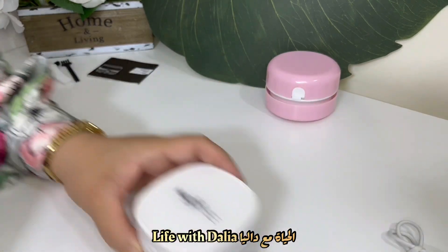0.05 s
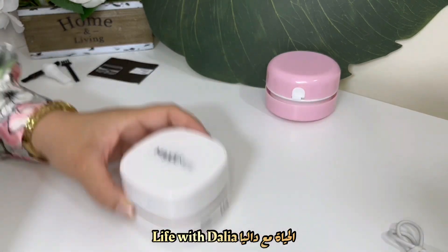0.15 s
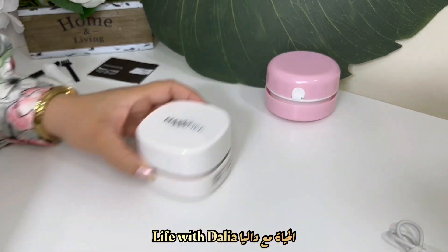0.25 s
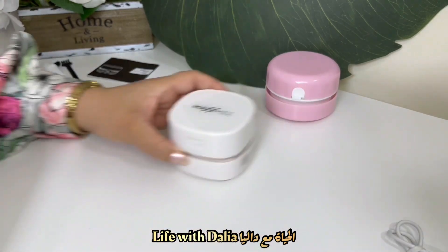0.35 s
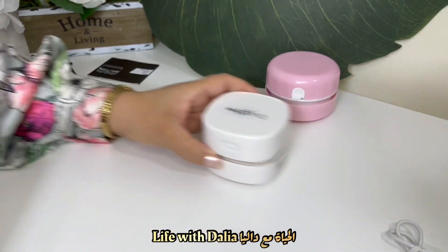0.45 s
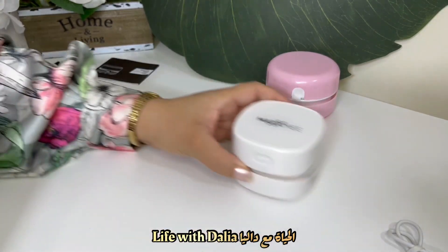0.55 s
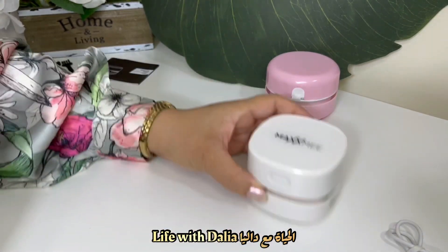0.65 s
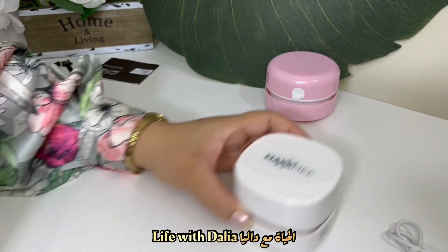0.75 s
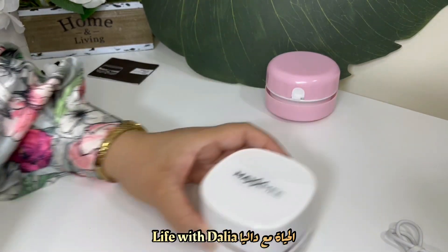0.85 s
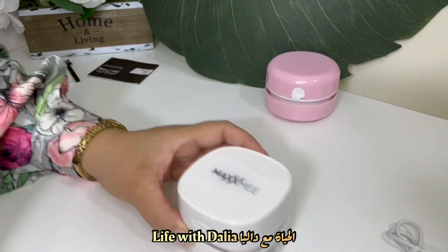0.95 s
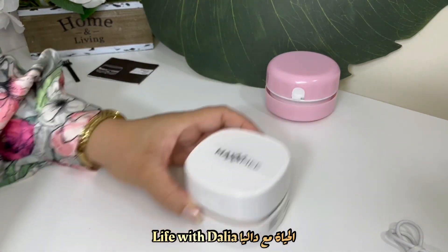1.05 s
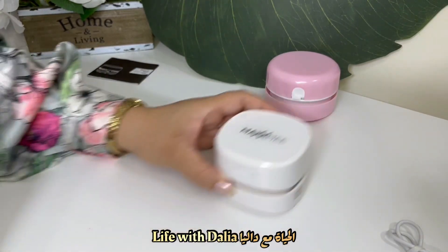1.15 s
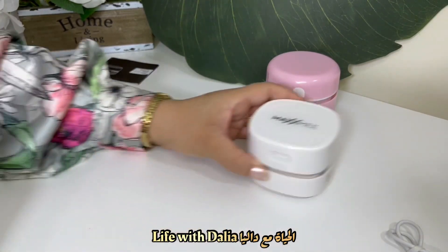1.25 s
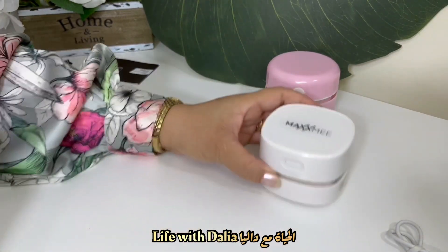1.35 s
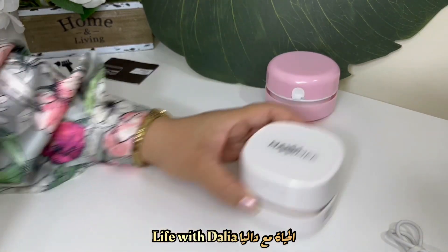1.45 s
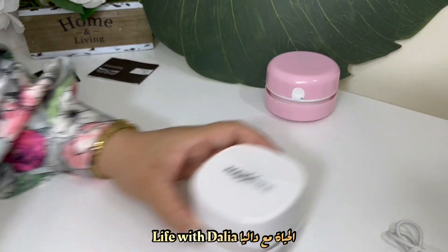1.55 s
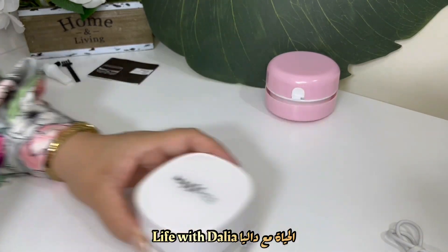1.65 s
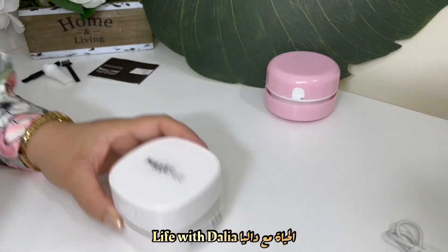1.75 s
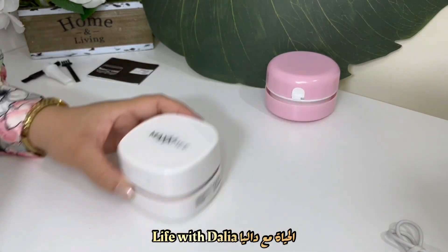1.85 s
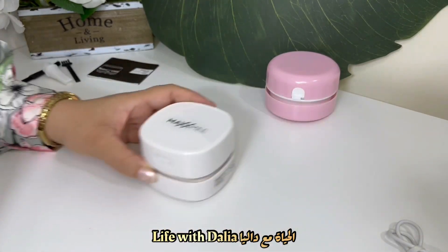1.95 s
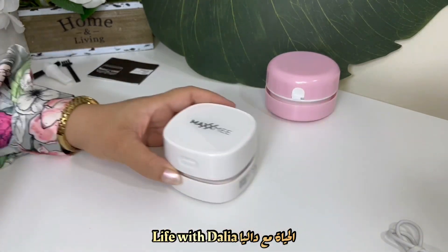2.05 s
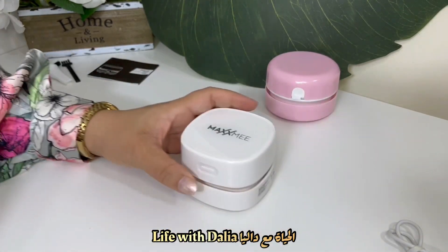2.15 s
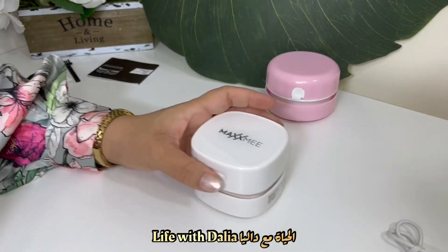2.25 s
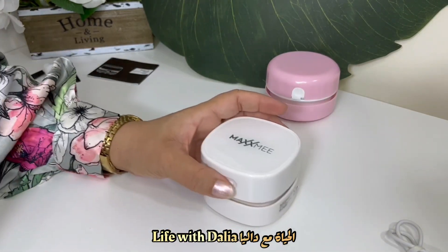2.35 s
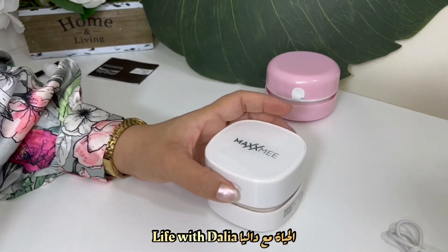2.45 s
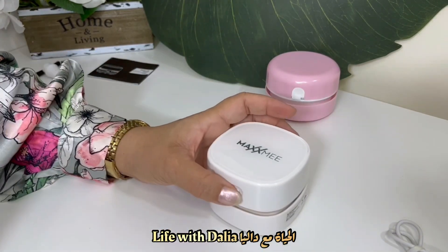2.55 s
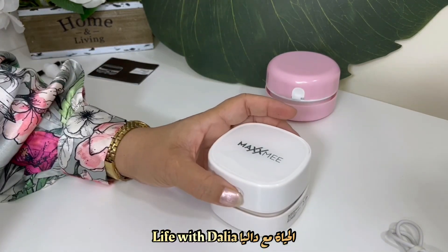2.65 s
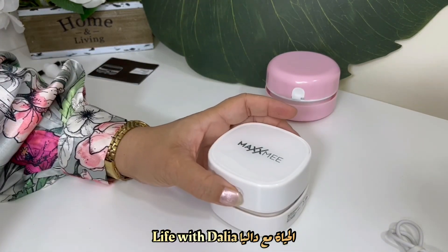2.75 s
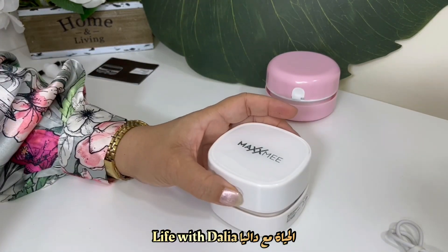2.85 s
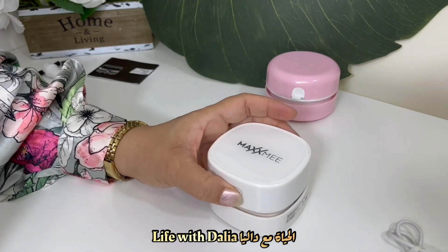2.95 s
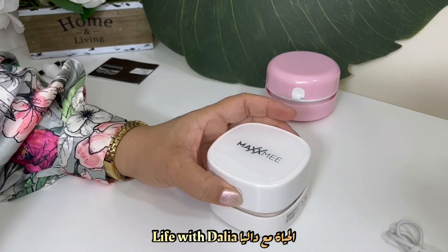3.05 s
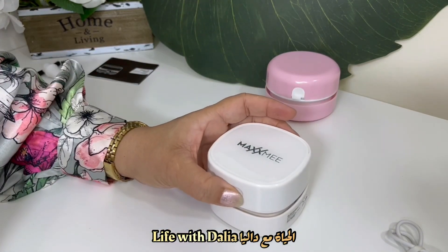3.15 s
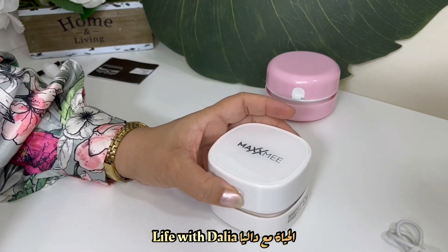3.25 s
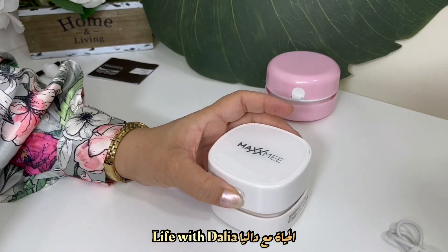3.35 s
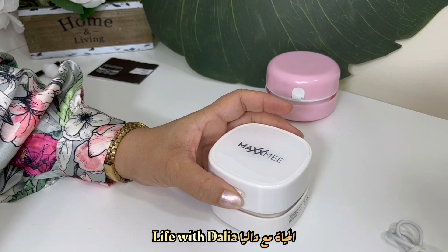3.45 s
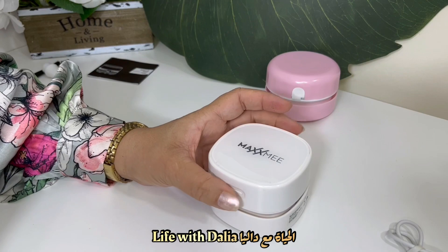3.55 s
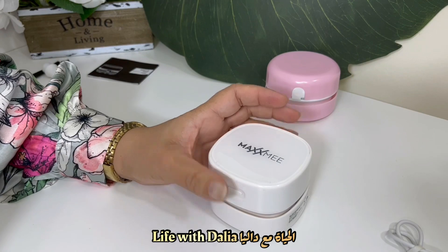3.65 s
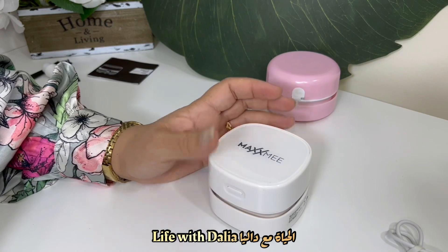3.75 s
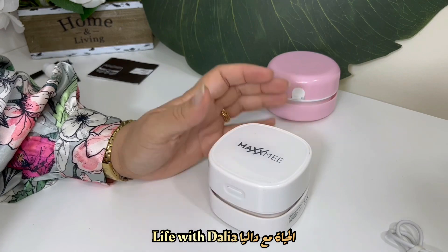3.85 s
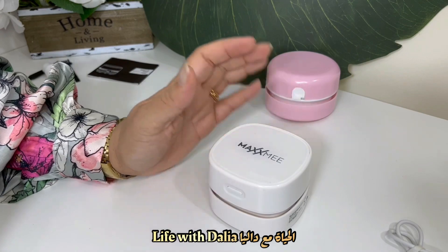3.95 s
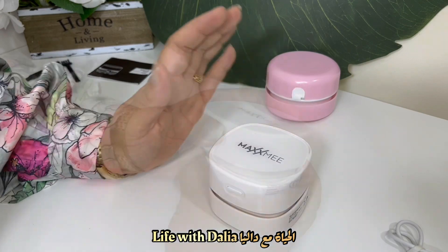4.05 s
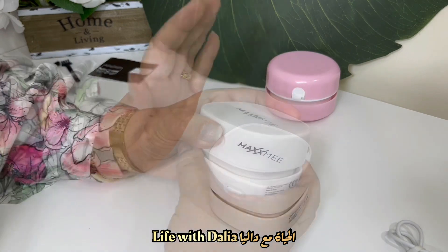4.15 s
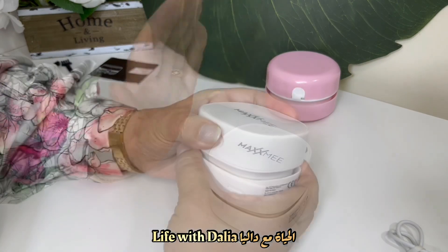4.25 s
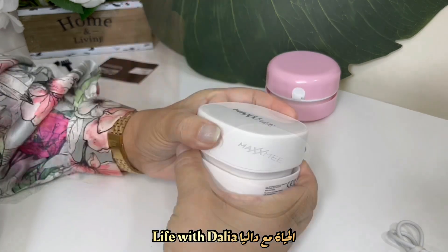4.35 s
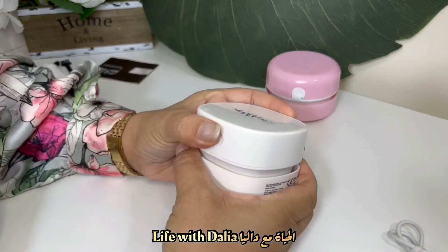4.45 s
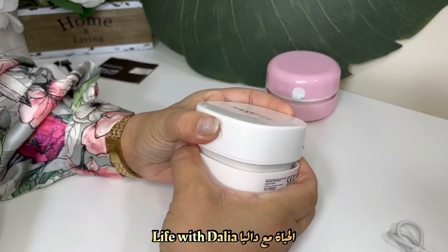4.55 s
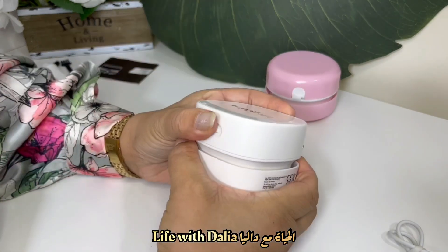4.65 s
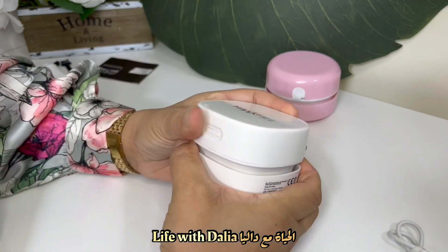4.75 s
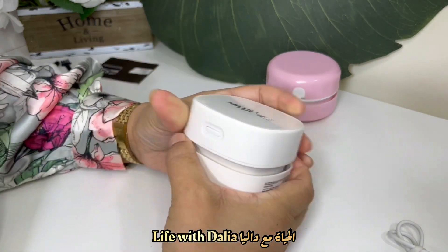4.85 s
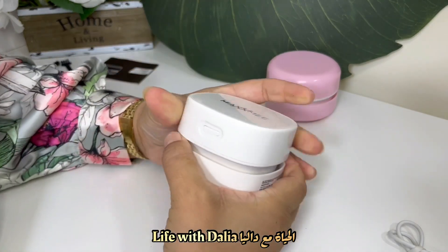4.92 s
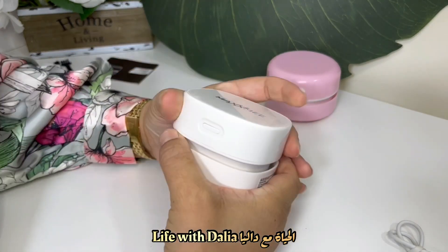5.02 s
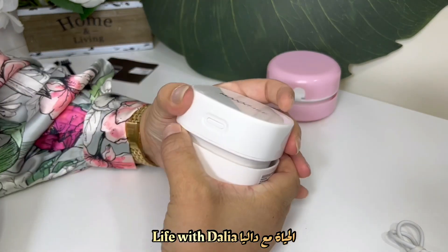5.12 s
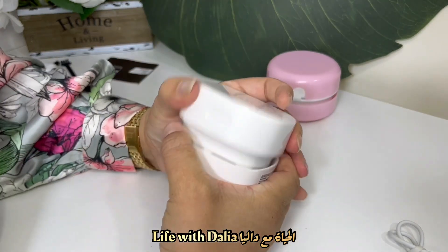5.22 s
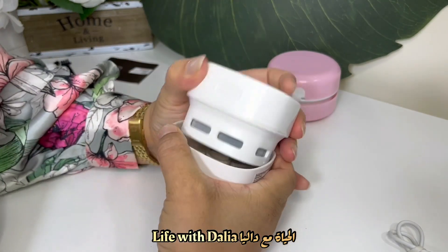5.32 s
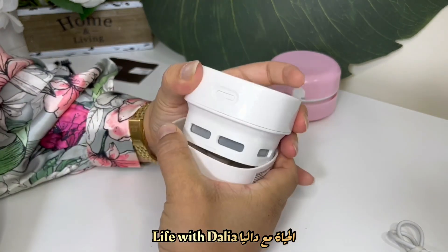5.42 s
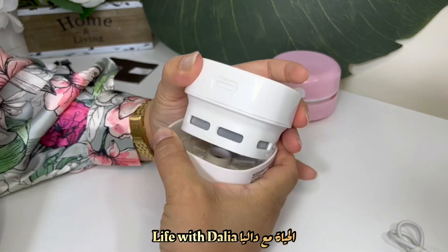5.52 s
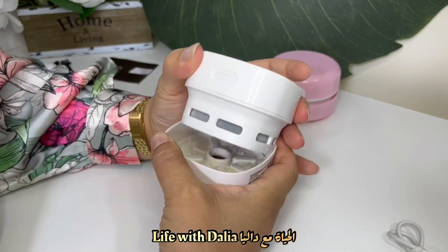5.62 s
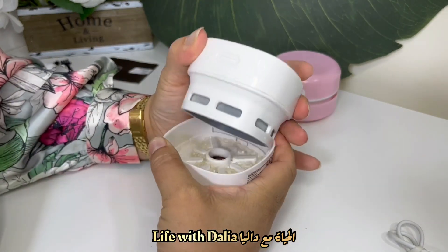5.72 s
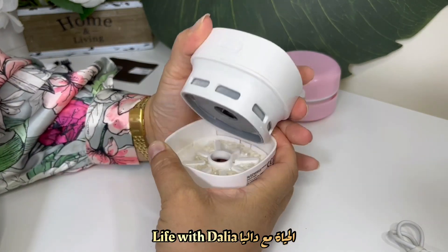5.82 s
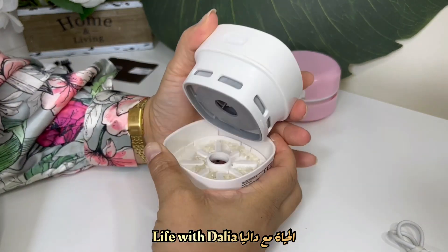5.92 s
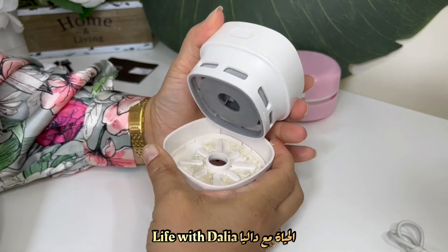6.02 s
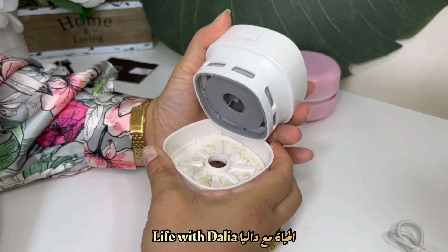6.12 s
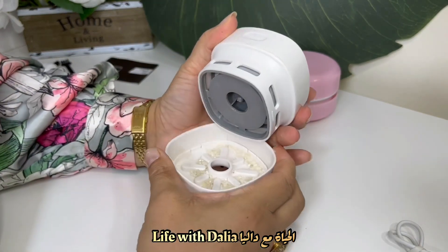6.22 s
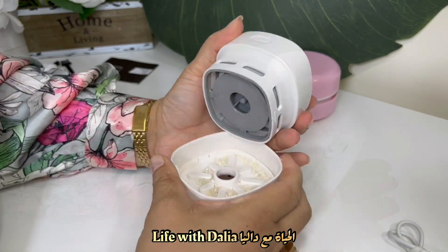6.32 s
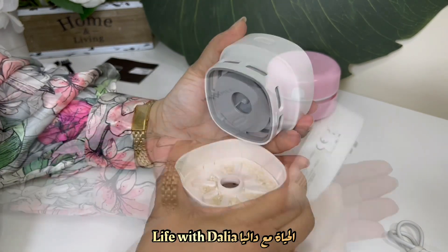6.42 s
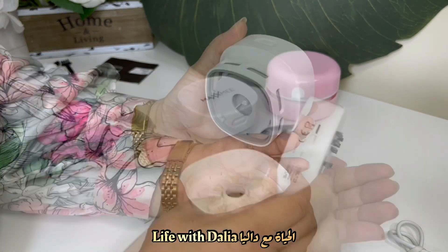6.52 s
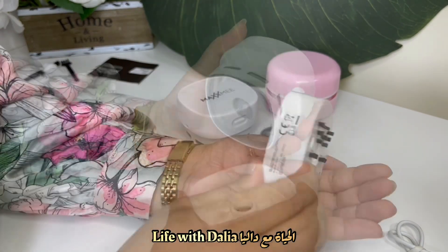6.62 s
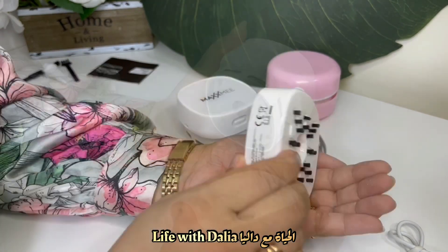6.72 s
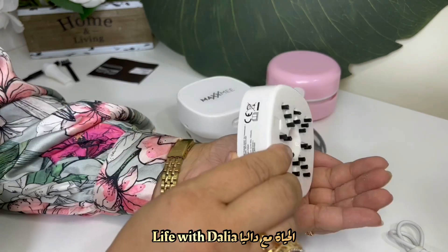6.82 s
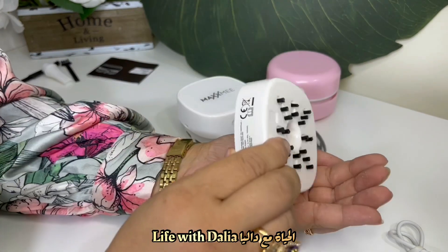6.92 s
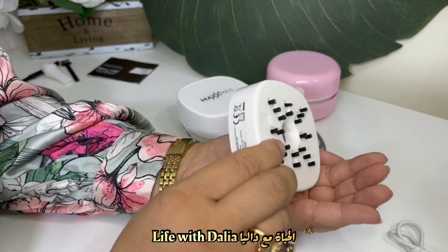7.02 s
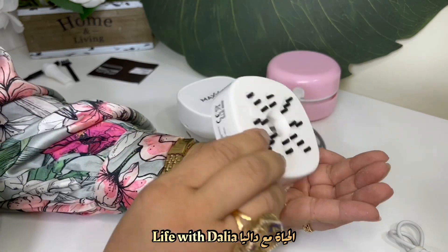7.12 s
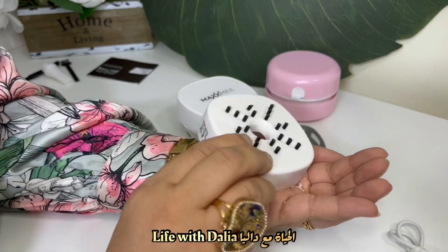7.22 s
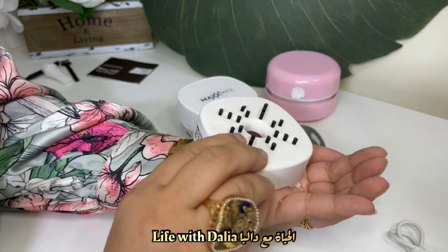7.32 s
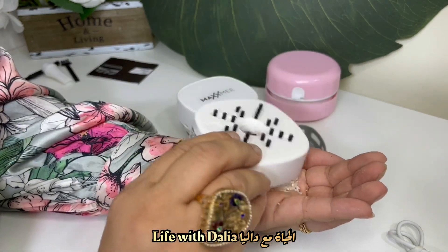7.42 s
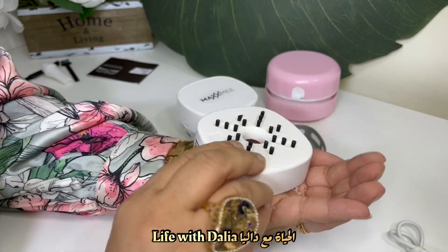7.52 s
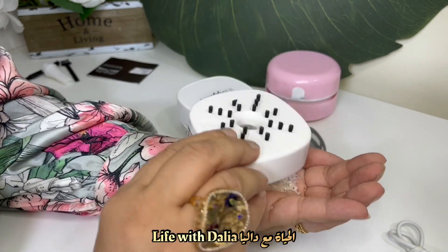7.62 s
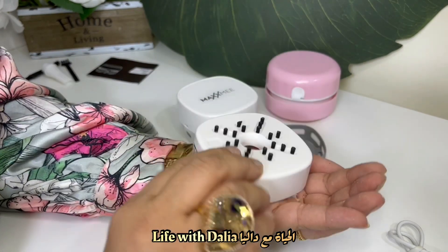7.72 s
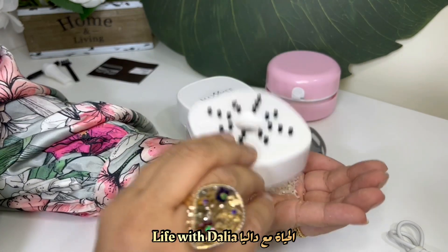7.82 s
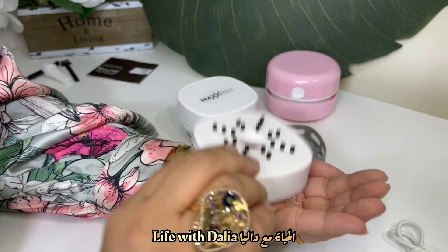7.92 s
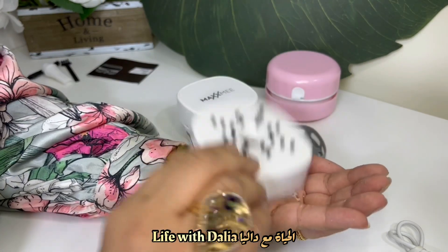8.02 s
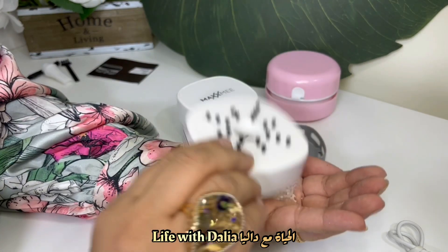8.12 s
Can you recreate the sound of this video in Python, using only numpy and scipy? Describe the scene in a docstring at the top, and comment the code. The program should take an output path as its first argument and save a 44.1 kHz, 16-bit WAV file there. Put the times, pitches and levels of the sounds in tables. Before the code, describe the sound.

A small battery vacuum hisses with rice grains hailing inside its plastic cup, coasts down, is snapped open, then rice is poured and tapped out.

```python
"""A palm-sized battery vacuum is slid over a table; rice grains whirl inside and hail on its plastic cup.
It is switched off: the fan coasts down, its motor hums and knocks, and the last grains drop.
The cup is twisted off with scrapes and snaps, then the rice is poured and tapped out into a hand.
Random grain hits, rubbing noise and air noise ring filters shaped like each object; sine waves make the hums.
A small room answers, over a faint rumble and hum."""
import sys
import numpy as np
from scipy import signal
from scipy.fft import rfft, irfft, next_fast_len
from scipy.io import wavfile

SR = 44100
rng = np.random.default_rng(int(sys.argv[2]) if len(sys.argv) > 2 else 0)


def transcribe(signal):
    """Save signal, clipped to [-1, 1], as a 16-bit WAV file at the path in sys.argv[1]."""
    frames = np.atleast_2d(signal).T
    limited = np.clip(frames, -1, 1)
    pcm = np.round(limited * 32767).astype(np.int16)
    wavfile.write(sys.argv[1], SR, pcm)


N = 360297
T = np.arange(N) / SR
SIZE = 2 ** 13  # filter length in samples
HZ = np.maximum(np.arange(SIZE // 2 + 1) * SR / SIZE, 1)
CUTOFF_HZ = 15850


def from_db(db):
    """Turn decibels into gain."""
    return 10 ** (np.asarray(db) / 20)


def rms_one(x):
    """Scale to an rms of 1."""
    return x / np.sqrt(np.mean(x ** 2) + 1e-20)


def over_hz(points, at=HZ):
    """Join points by straight lines on a log-frequency axis."""
    hz, value = np.transpose(points)
    return np.interp(np.log(at), np.log(hz), value)


def resonances(modes):
    """Gain of several resonances, their powers added."""
    power = 0
    for hz, width_hz, db in modes:
        detuning = (HZ ** 2 - hz ** 2) / (HZ * width_hz)
        power = power + from_db(db) ** 2 / (1 + detuning ** 2)
    return np.sqrt(power)


def drift(rate_hz):
    """Slow random wavering with an rms of 1, drawn at every 20th sample."""
    r = np.exp(-40 * np.pi * rate_hz / SR)
    noise = rng.standard_normal(N // 20 + 2002)
    slow = signal.lfilter([1], [1, -2 * r, r * r], noise)[2000:]
    return np.interp(np.arange(N) / 20, np.arange(len(slow)), rms_one(slow))


def radiate(force, gain):
    """Two rows of force ring a body: a filter of unit power that never sounds before the force."""
    gain = gain / np.sqrt(np.mean(gain[HZ < CUTOFF_HZ] ** 2))
    # Folding the cepstrum puts the filter's energy as early as possible (minimum phase).
    cepstrum = irfft(np.log(gain + 1e-6))
    cepstrum[1:SIZE // 2] *= 2
    cepstrum[SIZE // 2 + 1:] = 0
    response = irfft(np.exp(rfft(cepstrum)))
    rung = signal.oaconvolve(force, response[None], axes=1)
    return rung[:, :force.shape[1]]


def hail(per_s, spread_db):
    """Random impacts of uneven size, scaled so that the rate does not change the level."""
    sizes = from_db(spread_db * np.minimum(rng.exponential(1, N), 4))
    chance = np.clip(per_s / SR, 1e-5, 1)
    hits = (rng.random(N) < chance) / np.sqrt(chance)
    return rms_one(sizes) * hits * rng.standard_normal((2, N))


def contacts(times, levels_db, chatter_s):
    """Each contact is a burst of tiny random impacts that dies within milliseconds."""
    force, age = np.zeros((2, N + SR)), T[:SR // 20]
    for s, db in zip(times, levels_db):
        start = round(s * SR)
        burst = rng.standard_normal((2, len(age))) * np.exp(-age / chatter_s)
        force[:, start:start + len(age)] += from_db(db) * burst
    return force[:, :N]


def struck(s, db, chatter_s, gain):
    """One contact rings a body with a colour of its own."""
    out, age, start = np.zeros((2, N + SR)), T[:SR // 6], round(s * SR)
    burst = from_db(db) * rng.standard_normal((2, len(age))) * np.exp(-age / chatter_s)
    out[:, start:start + len(age)] = radiate(burst, gain)
    return out[:, :N]


def ramp(start, length):
    """Rise from 0 to 1 in a straight line."""
    return np.clip((T - start) / max(length, 1e-4), 0, 1)


def since(start):
    """Seconds gone by since a moment, zero before it."""
    return np.maximum(T - start, 0)


def strokes(rows, release_s, column=0):
    """Gain of a run of gestures: each rises, holds and dies away; column picks one of their levels."""
    power = 0
    for start, rise, hold, *levels_db in rows:
        release = np.exp(-np.minimum(since(start + rise + hold) / release_s, 20))
        power = power + (from_db(levels_db[column]) * ramp(start, rise) * release) ** 2
    return np.sqrt(power)


ROOM_T60_S = 0.26  # the duller part of the tail falls 60 dB in this time


def room(x, wet_db, early_db):
    """Early echoes of nearby things shift slowly at random; in the diffuse tail the treble dies sooner."""
    age = T[:SR // 2]
    noise = rng.standard_normal((2, len(age)))
    dull = signal.sosfilt(signal.butter(1, 4500, fs=SR, output="sos"), noise)
    bright_fade = from_db(-60 * age / (0.35 * ROOM_T60_S))
    tail = dull * from_db(-60 * age / ROOM_T60_S) + (noise - dull) * bright_fade
    tail = rms_one(tail * (age > .004)) / np.sqrt(len(age))
    out = x + from_db(wet_db) * signal.oaconvolve(x, tail, axes=1)[:, :N]
    # Two patterns of early echoes trade places slowly.
    age, place = T[:SR // 40], 1.5 * drift(1.5)
    for share in (np.cos(place), np.sin(place)):
        early = rng.standard_normal((2, len(age))) * np.exp(-age / 0.004) * (age > .001)
        early = rms_one(early) / np.sqrt(len(age))
        out = out + from_db(early_db) * share * signal.oaconvolve(x, early, axes=1)[:, :N]
    return out


# Colour of the room rumble: pitch_hz, relative level_db
RUMBLE_COLOUR = [(20, -29.5), (40, -15), (60, -4), (120, -7), (190, -19.5), (300, -18.5), (480, -26),
                 (800, -33), (1200, -42.5), (2200, -38.5), (3000, -45), (8000, -49), (15600, -61.5)]
# Tones of the room hum: pitch_hz, relative level_db
ROOM_HUM = [(99, -2), (148, -7.5)]
# Pushing and handling the vacuum: start_s, rise_s, hold_s, relative level_db
HANDLING_RUMBLE = [(0, 0.0052, 0.045, -49.5), (.15, 0.048, 2.26, -71), (6.48, 0.26, 0.17, -64),
                   (7.35, 0.15, 0.82, -66)]
# Colour of that rumble: pitch_hz, relative level_db
HANDLING_COLOUR = [(25, -14.5), (70, -1), (130, -5), (220, -12), (400, -14), (700, -28.5), (2000, -56)]
# The background is faint at first and swells as the vacuum runs down.
RUMBLE_START_DB, HUM_START_DB = -74, -72.5
SWELL_DB, SWELL_START_S, SWELL_TAKES_S = 11.5, 3.6, 0.49


def background():
    """Shaped noise makes the low room rumble and the rumble of the hands; wavering sines make the hum."""
    rumble = radiate(rng.standard_normal((2, N)), from_db(over_hz(RUMBLE_COLOUR)))
    hum = 0
    for hz, db in ROOM_HUM:
        tone = np.sin(2 * np.pi * hz * T + 0.25 * drift(1.8))
        hum = hum + from_db(db + 2.1 * drift(4.3)) * tone
    swell = from_db(SWELL_DB * ramp(SWELL_START_S, SWELL_TAKES_S))
    hand_noise = radiate(rng.standard_normal((2, N)), from_db(over_hz(HANDLING_COLOUR)))
    hands = strokes(HANDLING_RUMBLE, release_s=0.14) * hand_noise
    steady = swell * (from_db(RUMBLE_START_DB) * rumble + from_db(HUM_START_DB) * hum)
    return steady + from_db(7.0) * hands


# Soft bumps on the table: start_s, relative level_db, pitch_hz, time to swell_s
BUMPS = [(.01, -44, 310, 0.0066), (.04, -52.5, 195.3, 0.016), (.11, -45.5, 111.6, 0.0078),
         (1.067, -49, 272, 0.035), (1.13, -40, 236.5, 0.01), (2.162, -39, 183.3, 0.0049),
         (2.178, -46.5, 118, 0.0088), (6.739, -36.5, 114.3, 0.0072), (6.776, -45, 100, 0.013)]
# The cup is tapped on the palm: start_s, click_db, knock_db, knock pitch_hz, thud_db, low bump_db (all relative)
TAPS = [(7.564, -48, -53.5, 1400, -46, -45), (7.753, -48, -42.5, 820, -37.5, -49.5),
        (7.9316, -48, -43.5, 1260, -35.5, -44), (8.1075, -46.5, -40.5, 1320, -38.5, -43.5)]
# The hand gives way just after each tap.
PALM_DELAY_S, PALM_HZ, PALM_SWELL_S = 0.0093, 99.7, .012


def bumps():
    """Soft contacts with the table and palm swell and die in a few low cycles."""
    out = np.zeros(N)
    palm = [(s + PALM_DELAY_S, db, PALM_HZ, PALM_SWELL_S) for s, *_, db in TAPS]
    for s, db, hz, swell_s in list(BUMPS) + palm:
        start = max(round(s * SR), 0)
        age = T[:min(SR // 3, N - start)]
        envelope = age / swell_s * np.exp(1 - age / swell_s)
        out[start:start + len(age)] += from_db(db) * envelope * np.sin(2 * np.pi * hz * age)
    return from_db(2.0) * out


# Once switched off, the motor's speed falls by a factor e in COAST_S.
SWITCH_OFF_S, TURNS_PER_S, COAST_S = 2.912, 56.5, 1.02
# Friction brings the rotor to rest.
STALL_S, STALL_DB_PER_S = 3.935, 44


def speed():
    """Rotor speed as a share of full speed."""
    return np.exp(-since(SWITCH_OFF_S) / COAST_S)


def run_down(power):
    """Gain of a sound that follows a power of the rotor speed and fades as the rotor stalls."""
    return speed() ** power * from_db(-STALL_DB_PER_S * since(STALL_S))


# Resonances of the motor on its mount: pitch_hz, width_hz, relative level_db
MOUNT = [(236, 31, 9), (298, 37, 13.5), (443, 42, 3.5)]
# Overtones of the motor: multiple of its speed, relative level_db
HUM_ORDERS = [(8, -7), (10, 1.5), (11, -1), (14, -12), (18, -12)]
MOTOR_HUM_DB = -64.5
# The slowing rotor starts to hum and knock in its mount.
KNOCK_START_S, KNOCK_RISE_S, KNOCK_DB = 3.32, 0.11, -59.5


def motor_hum():
    """Overtones of the coasting motor glide down through the resonances of its mount and throb once a turn."""
    turns_per_s, mount, out = TURNS_PER_S * speed(), resonances(MOUNT), 0
    for multiple, db in HUM_ORDERS:
        hz = multiple * turns_per_s
        gain = from_db(db) * (np.interp(hz, HZ, mount) / mount.max()) ** 0.35
        out = out + gain * np.sin(2 * np.pi * np.cumsum(hz) / SR + 0.34 * drift(8))
    turns_left = turns_per_s * COAST_S
    throb = from_db(-3.5 * np.sin(2 * np.pi * turns_left))
    fade_in = ramp(KNOCK_START_S, KNOCK_RISE_S)
    return from_db(MOTOR_HUM_DB) * fade_in * run_down(power=0.49) * throb * out


# The vacuum being slid about: time_s, treble spray_db, cup ring_db, midrange air_db (all relative)
RUNNING_LEVELS = [(0.0, -20.5, -26, -42), (0.131, -24, -28, -42.5), (0.19, -22.5, -28.5, -42),
                  (0.579, -24.5, -27.5, -41), (0.631, -22.5, -26.5, -41.5), (0.97, -26.5, -30, -46.5),
                  (0.98, -26, -29.5, -42.5), (1.201, -24, -29.5, -42.5), (1.232, -30.5, -35.5, -51),
                  (1.281, -21, -26.5, -41), (1.32, -26.5, -31, -42.5), (1.69, -26, -30.5, -50),
                  (1.71, -26, -25.5, -45), (1.75, -26, -31.5, -49.5), (2.2, -23.5, -30.5, -47.5),
                  (2.25, -23, -30, -41), (2.29, -23, -29.5, -47), (2.7, -25.5, -31, -45),
                  (2.9, -26.5, -34, -49.5)]


def running_gains():
    """Gains of spray, cup ring and air before the run-down is applied."""
    s, *columns = np.transpose(RUNNING_LEVELS)
    return [from_db(np.interp(T, s, db)) for db in columns]


# Colour of air through the fan: pitch_hz, relative level_db
AIR = [(60, -25.5), (250, -16.5), (520, -17.5), (820, -6), (950, -10), (1150, 1.5), (1550, -6), (1900, -7),
       (2400, -16), (6500, -11), (15000, -34.5)]


def fan():
    """Air rushes through the slots; the coasting rotor nudges its mount once a turn."""
    flow = running_gains()[2] * run_down(power=2.77) * from_db(-3.5 * ramp(SWITCH_OFF_S, 0.012))
    air = from_db(5.0) * flow * radiate(rng.standard_normal((2, N)), from_db(over_hz(AIR)))
    turns_per_s = TURNS_PER_S * speed()
    # Each whole turn lost from the turns still to go gives one knock.
    turns_left = np.floor(turns_per_s * COAST_S)
    knocks = -np.diff(turns_left, prepend=turns_left[0]) * np.sqrt(SR / turns_per_s)
    force = knocks + .06 * rng.standard_normal((2, N))
    knocking = from_db(KNOCK_DB) * ramp(KNOCK_START_S, KNOCK_RISE_S) * run_down(power=0.48)
    return air + knocking * radiate(force, resonances(MOUNT) ** 1.35 / (1 + (HZ / 480) ** 6))


# The swirl of rice collapses, then the last grains settle.
COLLAPSE_S, COLLAPSE_DB, SETTLED_S, SETTLE_DB_PER_S = 3.495, 6.5, 3.586, 113


def settling(share):
    """Gain that falls as the swirl collapses and again as the last grains settle; share scales the fall."""
    collapse_db = COLLAPSE_DB * ramp(COLLAPSE_S, 0.016)
    settle_db = SETTLE_DB_PER_S * np.minimum(since(SETTLED_S), .45)
    return from_db(-share * (collapse_db + settle_db))


# Low resonances of the air slots: pitch_hz, width_hz, relative level_db
LOW_SLOT = [(806, 69, -2.5), (935, 82, -6.5)]
# High resonances of the air slots: pitch_hz, width_hz, relative level_db
HIGH_SLOT = [(1900, 520, -3.5), (2887, 330, 1)]
# The high ones grow as the vacuum comes to stand on the table.
SET_DOWN_S, SET_DOWN_TAKES_S, SET_DOWN_DB = 1.46, 0.53, 13


def slots():
    """The air slots ring in a gusty draught; the low ring lingers in the coast, the high dies with the swirl."""
    draught = rng.standard_normal((2, N)) * from_db(3.1 * drift(25))
    low = from_db(-69.0) * run_down(power=0.47) * radiate(draught, resonances(LOW_SLOT) ** 2.0)
    high_db = -55 + SET_DOWN_DB * ramp(SET_DOWN_S, SET_DOWN_TAKES_S)
    high_gain = from_db(high_db) * run_down(power=1.3) * settling(share=0.88)
    return low + high_gain * radiate(draught, resonances(HIGH_SLOT) ** 1.8)


# Plastic ticks and snaps: start_s, crack_db, hollow body_db (relative), body pitch_hz
SNAPS = [(3.7044, -32, -46.5, 1210), (4.364, -61, -72, 1730), (4.565, -51, -79, 1695),
         (4.6305, -48, -56, 1296), (4.9422, -60, -63, 900), (5.194, -36.5, -37.5, 3000),
         (5.1985, -41, -40, 470), (5.2079, -29, -40.5, 428), (5.22, -33, -44, 1700),
         (5.272, -32.5, -37, 1700), (5.277, -30.5, -40, 1600), (5.3271, -37.5, -30, 1050),
         (5.3349, -42, -31.5, 1450), (5.344, -41, -33.5, 1340), (5.357, -52, -42, 1500),
         (5.519, -63, -54, 1400), (5.551, -62, -54.5, 750), (5.631, -45, -74, 1700),
         (5.6675, -44.5, -44.5, 1300), (5.683, -18, -29.5, 1700), (5.6942, -8.5, -25, 1500),
         (5.7045, -26, -30.5, 1550), (5.731, -44.5, -40, 1550), (5.7505, -39.5, -43.5, 1200),
         (5.767, -38, -40.5, 720), (5.782, -18, -33.5, 1390), (5.788, -20, -31.5, 1590),
         (5.7948, -31, -35, 1750), (5.855, -43, -45.5, 700), (6.101, -58.5, -87, 1700),
         (6.9048, -52, -47.5, 2300), (6.923, -59, -67, 1500)]
# Colour of the crack: pitch_hz, relative level_db
CRACK = [(400, -10), (800, -26), (1100, 4.5), (1800, 3), (3000, 1), (5000, -3), (8000, 2), (9500, -11),
         (12200, 4), (15600, -3.5)]
# Resonances of the housing: pitch_hz, width_hz, relative level_db
HOUSING = [(416, 146, -8.5), (725, 200, -4), (1070, 136, -3), (1397, 100, -2), (1590, 210, -5),
           (1824, 160, -4), (2620, 300, -4), (3150, 280, -2.5)]
# Thin shell ringing when it snaps or scrapes: pitch_hz, width_hz, relative level_db
SHELL = [(2840, 446, 4), (3350, 200, -13), (4730, 420, 5), (8270, 352, -4.5)]
# Halves rub each other, fingers and palm: start_s, rise_s, hold_s, dull body_db, hiss_db (relative)
RUBS = [(4.2, 0.064, .08, -94, -83), (4.49, 0.14, 0.028, -62.5, -67.5), (4.69, 0.019, 0.087, -69, -69.5),
        (4.92, 0.019, 0.029, -69, -87), (5.19, 0.0024, 0.095, -56, -49.5),
        (5.326, 0.003, 0.012, -57, -53.5), (5.475, 0.038, 0.027, -59.5, -73), (5.56, 0.13, 0.022, -65, -58),
        (5.695, 0.014, 0.12, -67, -53), (5.778, 0.005, 0.0086, -48, -50.5), (5.82, 0.04, 0.0097, -62, -63),
        (6.3, 0.017, 0.089, -63, -82), (6.9, 0.0076, 0.019, -65.5, -72), (7.38, 0.016, 0.047, -69, -75),
        (7.575, .01, 0.043, -69, -69.5), (7.73, .004, .008, -70, -70), (7.765, 0.0092, 0.022, -75, -73),
        (7.945, 0.009, 0.029, -67, -72), (8.12, .01, 0.038, -65.5, -69)]
# Dull colour of plastic rubbing on plastic: pitch_hz, relative level_db
RUBBING = [(120, -19.5), (240, 2.5), (450, 1.5), (750, -0.5), (1000, -2.5), (1600, -1), (2400, -13),
           (4000, -35), (9000, -63.5)]
# Bright colour of the rubbing: pitch_hz, relative level_db
RUB_HISS = [(1000, -37.5), (2800, -3), (4900, 6), (8200, 1), (9500, 1), (12000, 1.5), (15600, 4.5)]
# The grip decides which housing resonances a snap brings out: width as a share of its pitch.
SNAP_WIDTH = 0.39


def opening():
    """The halves scrape, stick and slip; catches snap with a bright crack over the hollow housing."""
    s, crack_db, *_ = np.transpose(SNAPS)
    housing = resonances(HOUSING) / (1 + (HZ / 3200) ** 4)
    shell = resonances(SHELL)
    crack_force = contacts(s, crack_db - 4.5, chatter_s=0.0014)
    crack = radiate(crack_force, np.hypot(from_db(over_hz(CRACK)), shell))
    body = 0
    for at, _, db, hz in SNAPS:
        gain = housing * resonances([(hz, SNAP_WIDTH * hz, 0)])
        body = body + struck(at, db - 0.5, chatter_s=0.0022, gain=gain)
    slips = hail(1500, spread_db=1.0) * from_db(1.84 * drift(60.0))
    dull = radiate(slips, np.hypot(from_db(over_hz(RUBBING)), from_db(-5.5) * housing))
    bright = radiate(slips, np.hypot(from_db(over_hz(RUB_HISS)), shell))
    scrape = from_db(-2.0) * strokes(RUBS, release_s=0.014) * dull
    hiss = from_db(-2.0) * strokes(RUBS, release_s=0.025, column=1) * bright
    return crack + body + scrape + hiss


# Resonances of the tapped cup: pitch_hz, width_hz, relative level_db
TAPPED_CUP = [(810, 92, -5), (903, 80, 1), (1140, 200, -14.5), (1358, 150, -4.5), (1470, 130, -3),
              (1750, 130, -2)]
# Faint ring of the rim: pitch_hz, width_hz, relative level_db
RIM = [(2930, 34, 0)]
RIM_DB = -7.5  # relative to the click
# The palm's thud peaks after THUD_S; its pitch sinks by THUD_SAG_HZ to THUD_END_HZ.
THUD_S, THUD_END_HZ, THUD_SAG_HZ = 0.003, 178, 430


def taps():
    """The cup clicks and knocks on the palm, each time at another spot; its rim rings and the flesh thuds."""
    s, click_db, *_ = np.transpose(TAPS)
    force = contacts(s, click_db, chatter_s=0.00241)
    click = radiate(force, np.hypot(from_db(over_hz(RUB_HISS)), resonances(SHELL)))
    rim = from_db(RIM_DB) * radiate(force, resonances(RIM))
    knock, thud, age = 0, np.zeros(N), T[:SR // 20]
    turns = np.cumsum(THUD_END_HZ + THUD_SAG_HZ * np.exp(-age / THUD_S)) / SR
    swell = (age / THUD_S * np.exp(1 - age / THUD_S)) ** 4
    one_thud = swell * np.sin(2 * np.pi * turns)
    for at, _, knock_db, hz, thud_db, _ in TAPS:
        gain = resonances(TAPPED_CUP) * resonances([(hz, 0.4 * hz, 0)]) ** 1.3
        knock = knock + struck(at, knock_db, chatter_s=0.0035, gain=gain)
        start = round((at + 0.0011) * SR)
        thud[start:start + len(age)] += (from_db(thud_db) * one_thud)[:N - start]
    return click + rim + knock + thud


# The loudest grains bouncing in the open cup: start_s, relative level_db
BOUNCES = [(5.294, -38), (6.3356, -40), (6.4826, -34.5), (6.501, -34.5), (6.534, -25), (6.582, -27),
           (6.591, -28.5), (6.6, -28), (6.62, -28), (6.632, -21), (6.6517, -24.5), (6.6905, -27.5),
           (6.7246, -26), (6.74, -37), (6.7636, -30), (7.075, -42.5), (7.092, -48.5), (7.981, -49)]
# Rice slides each time the cup is tilted: start_s, rise_s, hold_s, hiss_db, cup ring_db (relative)
SLIDES = [(6.23, 0.058, 0.097, -53, -75), (6.38, 0.012, 0.11, -56, -83), (6.485, 0.066, 0.055, -43.5, -62),
          (6.68, 0.0204, 0.12, -54.5, -65.5), (6.82, .02, 0.21, -70.5, -74.5),
          (7.06, 0.0133, 0.016, -57, -65), (7.13, 0.0066, 0.021, -63.5, -61.5),
          (7.225, 0.0097, .015, -71, -71), (7.28, 0.0079, 0.013, -77, -71.5),
          (7.385, 0.01, 0.046, -73, -74), (8.15, 0.014, .02, -62, -60.5)]
# Colour of the poured grains: pitch_hz, relative level_db
POURED = [(200, -17.5), (1200, -104), (2200, -23), (3800, -12.5), (5200, 0), (8000, -0.5), (9200, -2.5),
          (12300, 2.5), (14000, 1), (15600, -4)]
# Resonances of the open cup: pitch_hz, width_hz, relative level_db
OPEN_CUP = [(1580, 81, -11), (1754, 160, -1), (3000, 220, -16)]
# Each tap shakes a little rice loose; levels start from that of its click.
SPILL_DELAY_S, SPILL_RISE_S, SPILL_HOLD_S = 0.0078, 0.021, 0.013
SPILL_HISS_DB, SPILL_RING_DB = -19, -29


def poured_rice():
    """Grains slide and bounce in the open cup and set its hollow ringing."""
    s, db = np.transpose(BOUNCES)
    bounces = contacts(s, db - 2.5, chatter_s=0.0022)
    slides = list(SLIDES)
    for at, tap_db, *_ in TAPS:
        levels_db = (tap_db + SPILL_HISS_DB, tap_db + SPILL_RING_DB)
        slides.append((at + SPILL_DELAY_S, SPILL_RISE_S, SPILL_HOLD_S, *levels_db))
    sliding = hail(3500, spread_db=2.0) * from_db(2.26 * drift(49))
    hiss_force = from_db(-2.0) * strokes(slides, release_s=0.015) * sliding + bounces
    ring_force = strokes(slides, release_s=0.012, column=1) * sliding + from_db(-16.5) * bounces
    hiss = radiate(hiss_force, from_db(over_hz(POURED)))
    return hiss + radiate(ring_force, resonances(OPEN_CUP) ** 1.1)


WANDER_S = .0012  # rms size of the wavering delay


def wander(x):
    """A wavering delay shifts the ring a little while the vacuum is slid, and stills once it stands."""
    lag_s = WANDER_S * drift(1.2) * (1 - ramp(SET_DOWN_S + SET_DOWN_TAKES_S, 0.48))
    return np.array([np.interp(T - lag_s, T, row) for row in x])


# The cup rubs hardest on the table: start_s, rise_s, hold_s, low ring_db, high ring_db (relative)
SWELLS = [(0.08, 0.015, .035, -25, -23), (0.51, 0.025, 0.066, -25.5, -36), (0.6, 0.017, 0.063, -22.5, -24),
          (0.69, 0.022, 0.15, -27.5, -45), (1.37, 0.029, 0.022, -27.5, -41.5),
          (1.68, .025, 0.025, -41, -28), (2.15, 0.13, 0.11, -35, -29)]
# Low resonances that swell: pitch_hz, width_hz, relative level_db
LOW_RING = [(3707, 203, -1.5), (3940, 600, -1.5), (4340, 210, 2)]
# High resonance that swells: pitch_hz, width_hz, relative level_db
HIGH_RING = [(5140, 170, 0)]


def cup_swells():
    """Rubbing over the table, the cup briefly sings at a low group of resonances and a high one."""
    friction = hail(6000, spread_db=0.5) * from_db(0.94 * drift(60))
    low = strokes(SWELLS, release_s=0.0083) * radiate(friction, resonances(LOW_RING) ** 2)
    high = strokes(SWELLS, release_s=0.015, column=1) * radiate(friction, resonances(HIGH_RING) ** 2)
    return from_db(-0.5) * wander(low + high)


# Colour of grains on the cup wall: pitch_hz, relative level_db
GRAIN = [(100, -42), (550, -40), (900, -24.5), (2300, -42), (3200, -14.5), (4700, -18), (6000, -9.5),
         (7300, -3.5), (8300, -12.5), (9100, -10), (10000, -6), (12000, -3), (13200, -8.5), (15600, -10.5)]
# Resonances of the closed cup: pitch_hz, width_hz, relative level_db
CUP = [(2884, 320, -5), (3684, 200, -6), (4090, 100, 1), (4260, 120, 2), (5105, 100, 1), (5550, 120, -1.5),
       (6225, 100, -0.5), (6593, 120, -3.5), (6943, 190, -4.5), (6970, 328, -6), (7680, 160, -3)]
# The loudest single grains dropping: start_s, relative level_db
LAST_GRAINS = [(3.325, -10.5), (3.442, -8), (3.4961, -7.5), (3.5935, -26), (3.624, -24), (3.634, -14.5),
               (3.66, -17), (3.672, -21.5), (3.685, -22), (3.704, -18), (3.731, -26), (3.764, -38),
               (3.7821, -19.5)]
# Strongest clumps thrown at the wall, and gaps between them: time_s, swell_db
SURGES = [(0.014, 2.5), (0.455, 3), (0.998, 3.5), (1.379, 5), (1.48, 2), (1.86, -4.5), (2.045, -4),
          (2.68, 0.5), (2.725, -5), (3.056, 3.5), (3.16, -7), (3.201, 6), (3.242, 6.5)]
SURGE_HALF_S = 0.012  # a surge falls by a factor e this far from its middle
# The rice circles in a loose bunch, swelling once and twice a lap; it weakens at switch-off.
LAPS_PER_S, LAP_DB, HALF_LAP_DB, SWIRL_SAG_DB = 11.3, 0.5, 1.0, 3.5


def whirling_rice():
    """Rice hails on the cup wall in clumps, lap after lap; as the swirl dies the grains thin out and drop singly."""
    spray, ring, _ = running_gains()
    swirl = from_db(-SWIRL_SAG_DB * ramp(SWITCH_OFF_S, 0.015)) * settling(share=1.0)
    spray = spray * swirl * run_down(power=0.75)
    ring = ring * swirl * run_down(power=1.9)
    lap = 2 * np.pi * np.cumsum(LAPS_PER_S * speed()) / SR + 1.4 * drift(2.0)
    lap_db = LAP_DB * np.cos(lap) + HALF_LAP_DB * np.cos(2 * lap)
    surge_db = sum(db * np.exp(-np.minimum(((T - s) / SURGE_HALF_S) ** 2, 20)) for s, db in SURGES)
    clumps = from_db(surge_db + lap_db + 0.31 * drift(29) + 1.1 * drift(200))
    grains_per_s = 22000 * spray / spray.max() + 400
    force = clumps * hail(grains_per_s, spread_db=3.0)
    s, db = np.transpose(LAST_GRAINS)
    drops = contacts(s, db - 12.0, chatter_s=0.0027)
    wall = radiate(from_db(2.0) * spray * force + drops, from_db(over_hz(GRAIN)))
    cup_force = from_db(4.5 + 1.1 * drift(13.0)) * ring * force + from_db(-5.0) * drops
    cup = radiate(cup_force, resonances(CUP) / (1 + (2400 / HZ) ** 6))
    return wall + wander(cup)


def scene():
    """The running vacuum, then the handling; row 0 is what both channels share, row 1 what sets them apart."""
    running = room(whirling_rice() + cup_swells() + fan() + slots(), wet_db=-12.5, early_db=-7)
    handling = room(opening() + poured_rice() + taps(), wet_db=-13, early_db=-4)
    return running + handling + motor_hum() + bumps() + background()


# Likeness of left and right: pitch_hz, likeness from 0 to 1
LIKENESS = [(100, .97), (200, .87), (1200, .9), (2200, .76), (4500, .68), (5300, .5), (7400, .55),
            (8100, .96), (16000, .96)]
# Phase of left against right: pitch_hz, phase_rad
PHASE = [(100, .05), (2000, .05), (3100, 1.0), (5200, .9), (6600, .2), (7600, .7), (8100, 0), (8900, 0),
         (9900, -2.9), (10600, -3.4), (11800, -6.28), (12500, -6.4), (13300, -9.1), (14200, -9.7),
         (15100, -12.56)]
# Left level minus right level: pitch_hz, balance_db
BALANCE_DB = [(100, -1), (1200, 1.5), (4000, 3), (7400, 3), (8200, -0.5)]


def record(dry):
    """Left and right are partly alike; their phase twists apart through the treble; the top is cut."""
    size = next_fast_len(N + SIZE)
    hz = np.maximum(np.arange(size // 2 + 1) * SR / size, 1)
    shared, opposed = rfft(dry, size)
    alike, sign = over_hz(LIKENESS, hz), np.array([[1], [-1]])
    channels = np.sqrt((1 + alike) / 2) * shared + sign * np.sqrt((1 - alike) / 2) * opposed
    balance = from_db(sign * over_hz(BALANCE_DB, hz) / 2)
    twist = np.exp(.5j * sign * over_hz(PHASE, hz))
    low_pass = 1 / np.sqrt(1 + (hz / CUTOFF_HZ) ** 300)
    return irfft(channels * balance * twist * low_pass, size)[:, :N]


dry = scene()
out = record(dry)
transcribe(out)
```